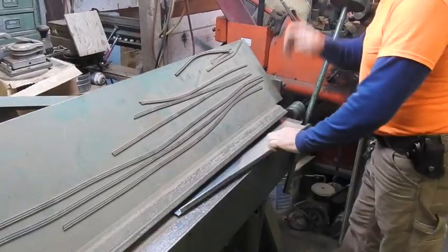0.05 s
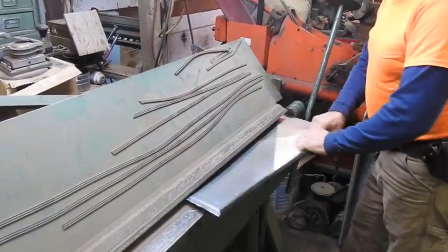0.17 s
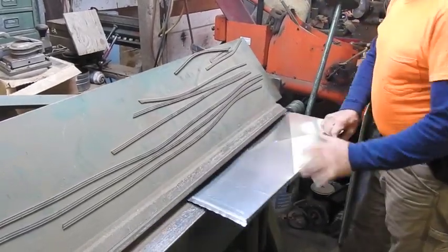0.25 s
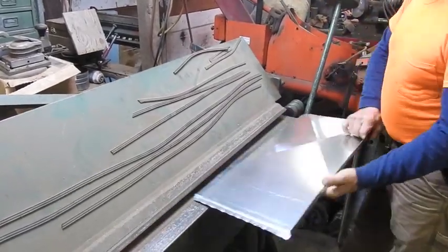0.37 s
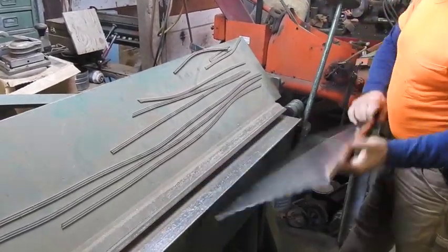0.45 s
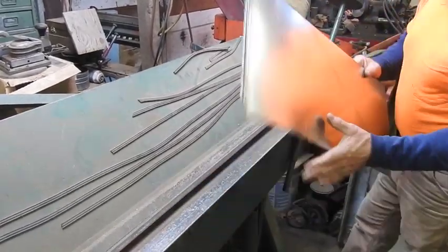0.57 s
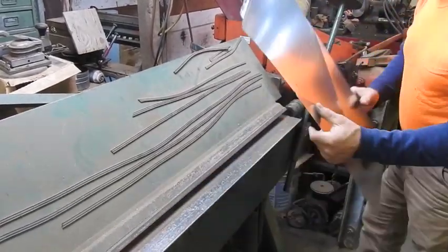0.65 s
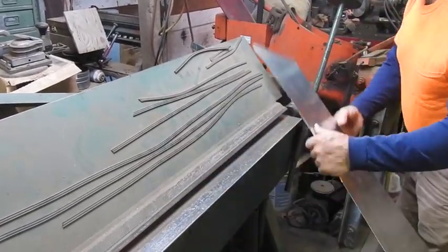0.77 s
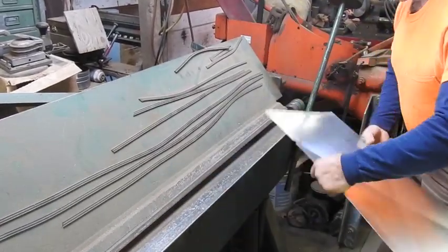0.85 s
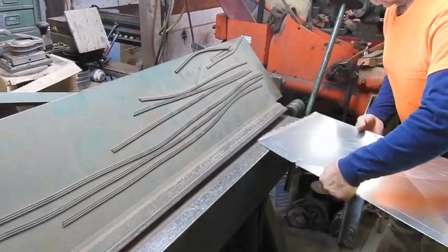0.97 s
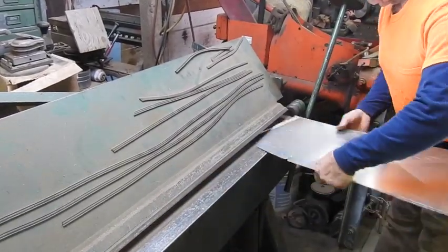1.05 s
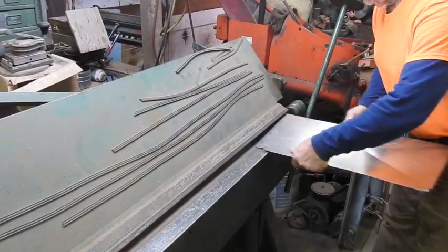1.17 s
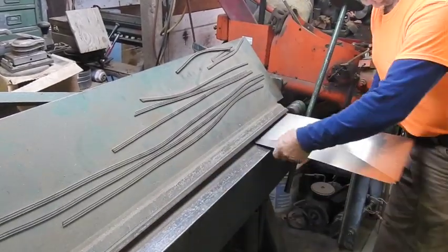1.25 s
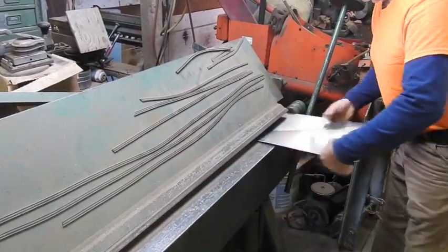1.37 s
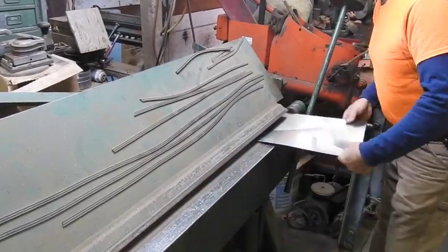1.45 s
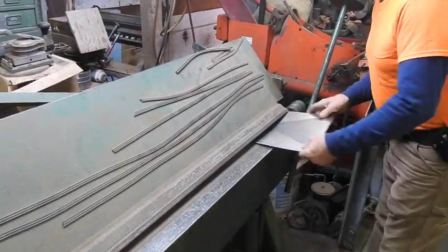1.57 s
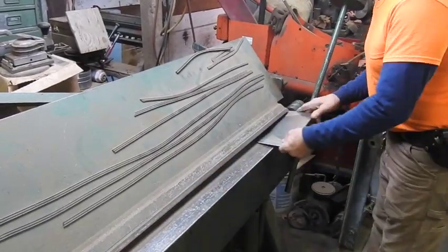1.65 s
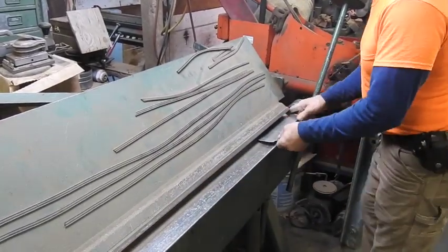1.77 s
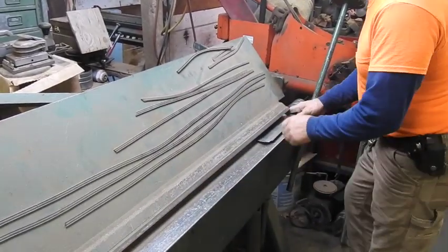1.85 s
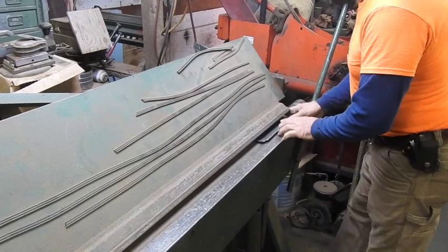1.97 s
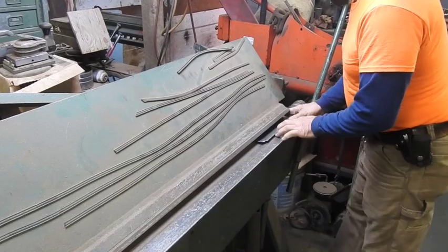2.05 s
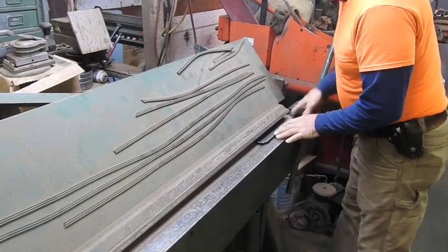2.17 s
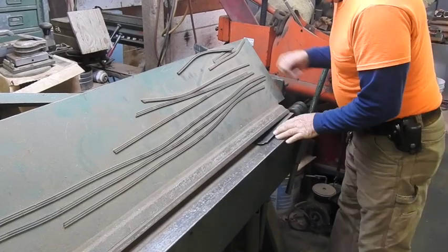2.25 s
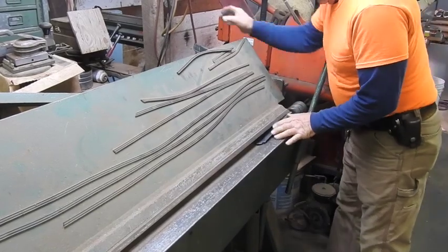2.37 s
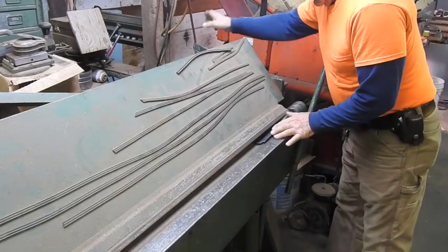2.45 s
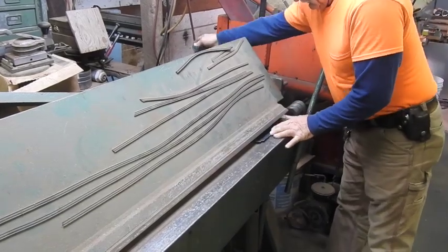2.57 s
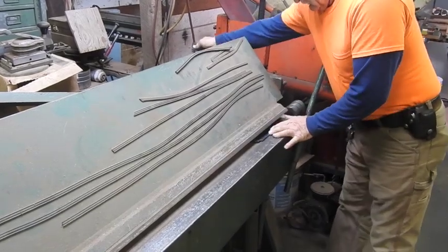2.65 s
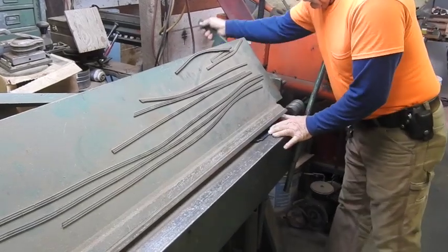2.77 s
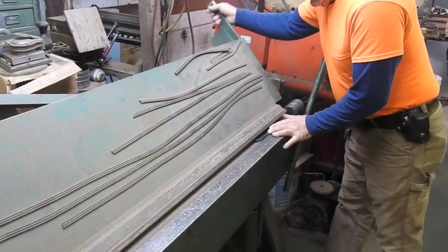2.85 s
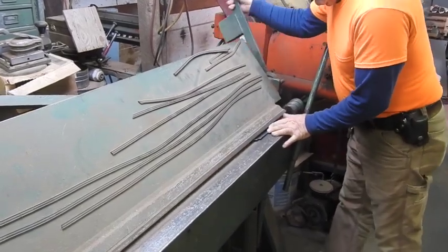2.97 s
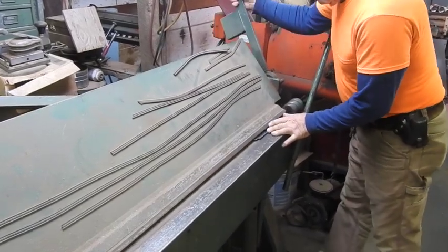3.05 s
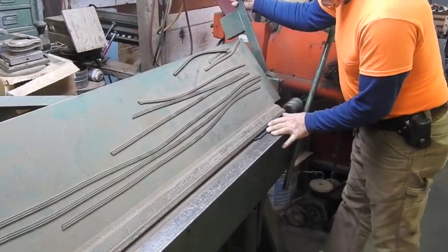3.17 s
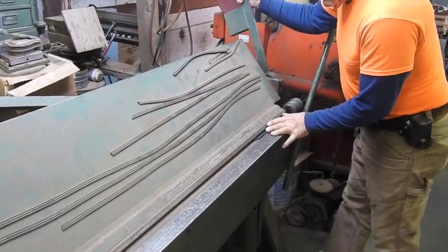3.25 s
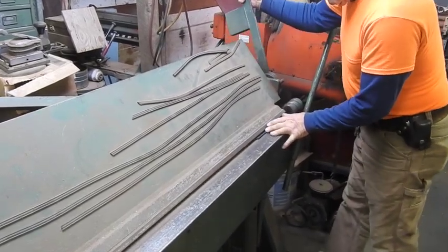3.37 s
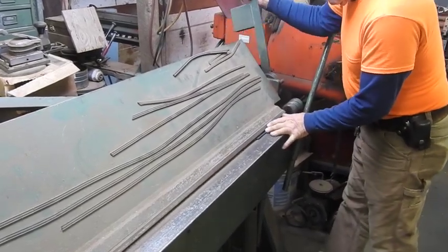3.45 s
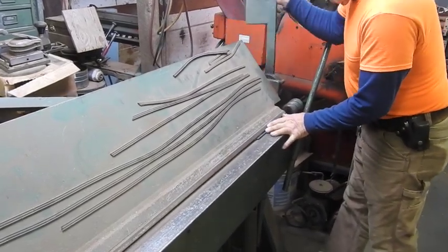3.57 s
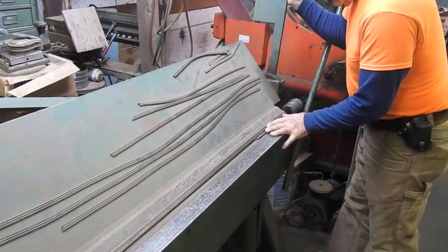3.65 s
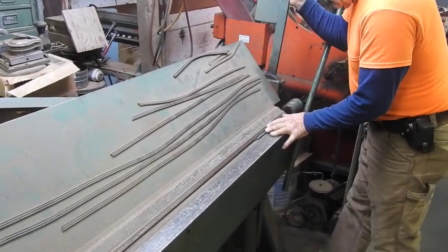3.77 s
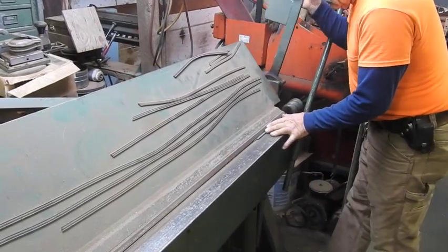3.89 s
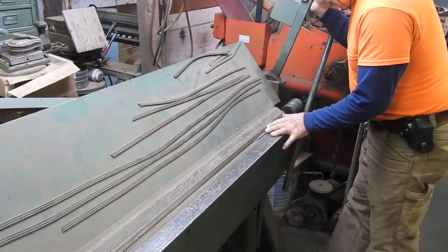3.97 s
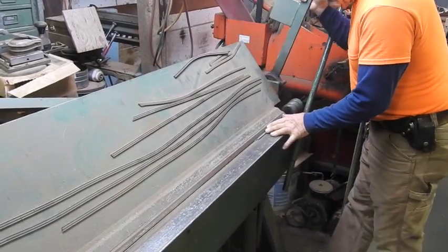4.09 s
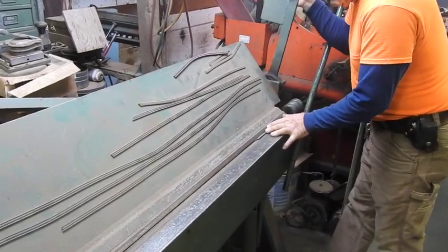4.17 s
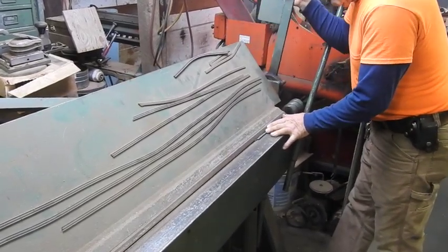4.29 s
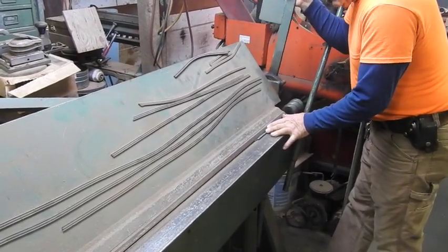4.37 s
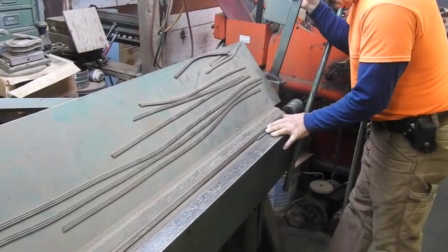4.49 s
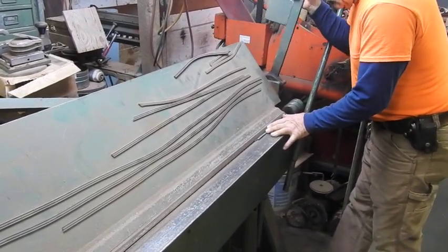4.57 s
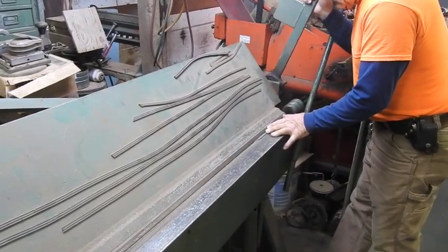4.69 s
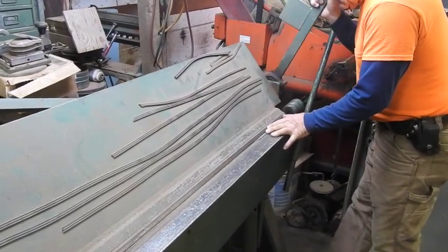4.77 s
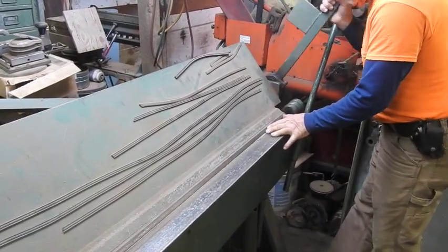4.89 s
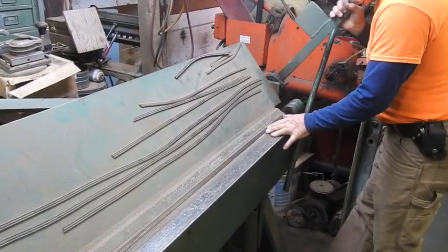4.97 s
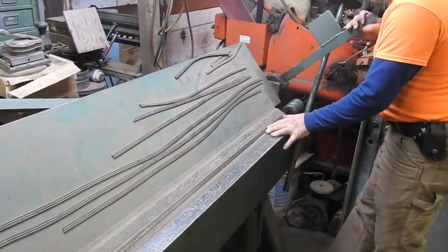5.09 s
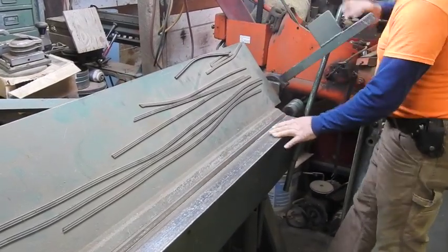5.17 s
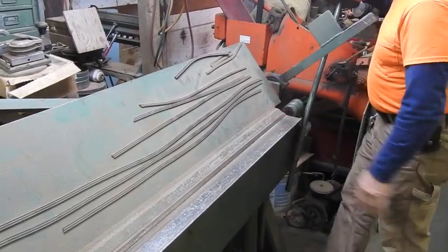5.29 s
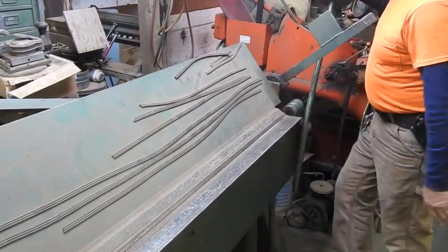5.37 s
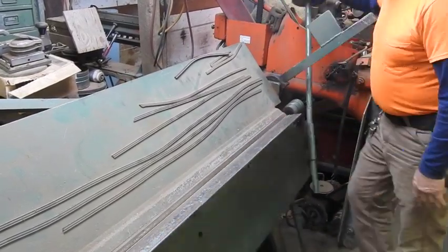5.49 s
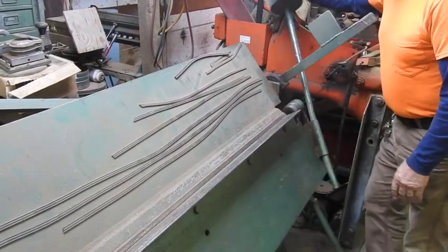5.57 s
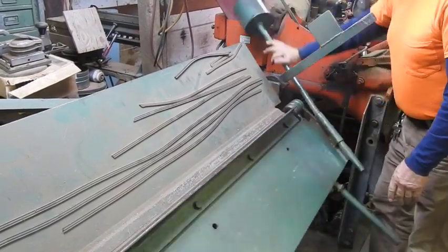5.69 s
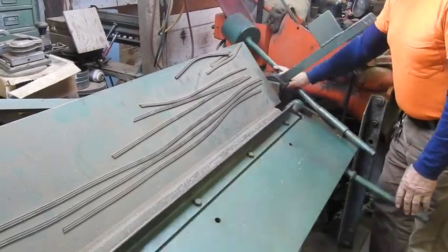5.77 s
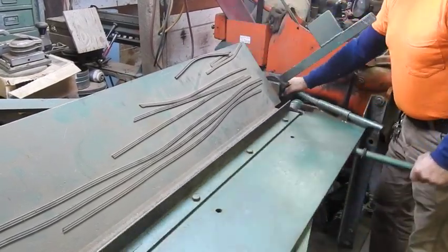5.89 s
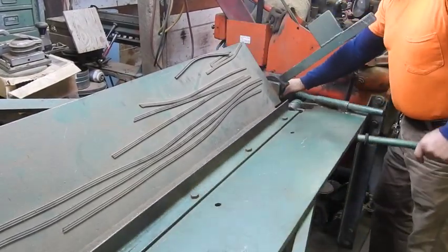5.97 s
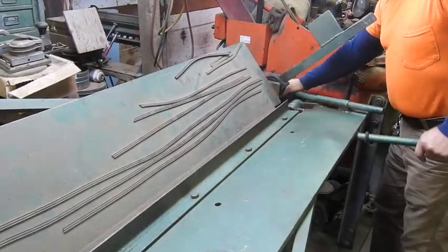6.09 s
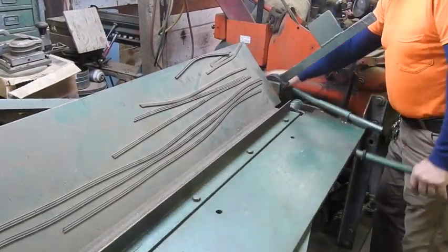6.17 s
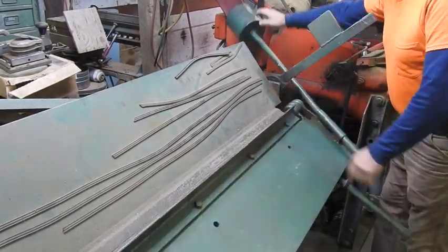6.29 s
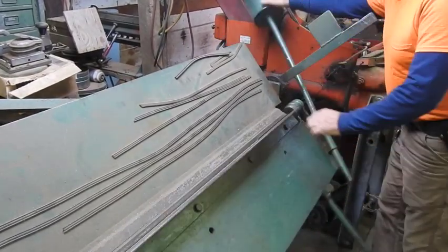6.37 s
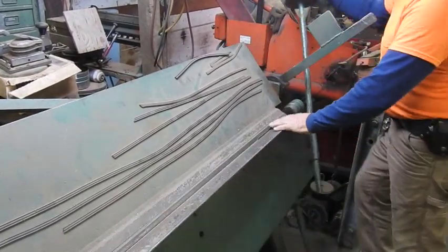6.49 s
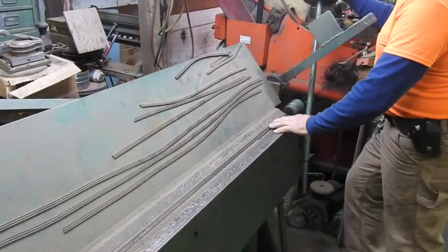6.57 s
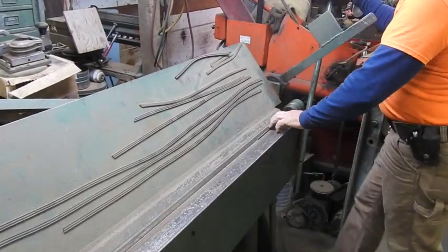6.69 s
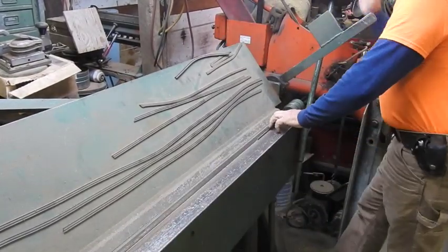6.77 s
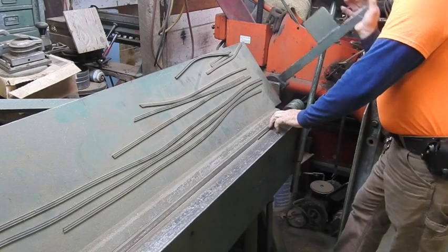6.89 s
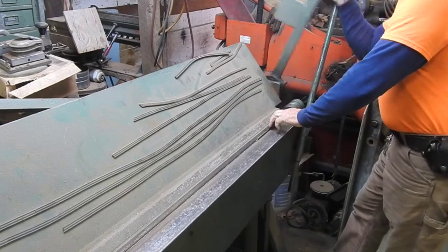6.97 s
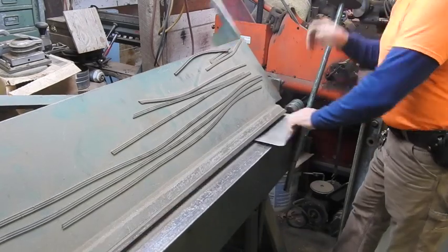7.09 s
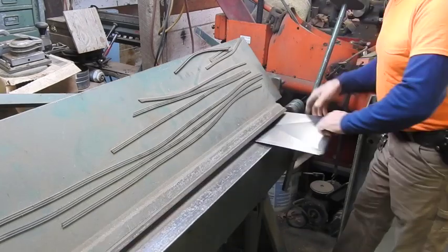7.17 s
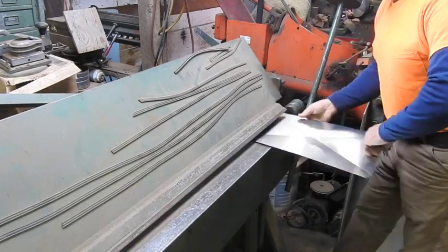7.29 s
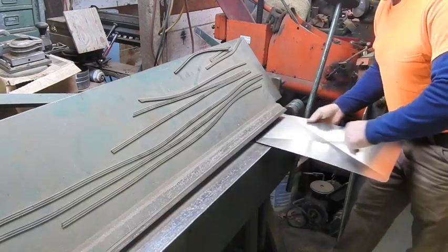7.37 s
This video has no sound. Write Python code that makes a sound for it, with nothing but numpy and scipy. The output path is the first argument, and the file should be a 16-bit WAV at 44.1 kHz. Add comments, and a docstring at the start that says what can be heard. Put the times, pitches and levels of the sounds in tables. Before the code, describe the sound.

Thin sheet metal hisses, bangs and squeals against a heavy steel bed, heard closely in stereo with short workshop reverberation. After a brief gap it is fed back with sharper, ringing scrapes and taps. The clamp lever thuds, then a long quieter stretch holds only light knocks, scuffs and faint hinge creaks over steady room noise. Finally several hard metal knocks cluster together and another ringing scrape bursts out.

```python
"""A steel sheet is dragged out of a hand bending brake, flipped with a crashing wobble and fed back under the jaw.
Frictional catches at its edge excite hiss, plate modes and the brake's bed; impulses make its landings.
The clamp lever knocks, the leaf swings up and back on creaking hinges, the clamp clanks open and the sheet
scrapes out: decaying noise and resonances form the knocks, gliding sines the creaks.
A small reverberant workshop with steady air noise and a faint mains buzz surrounds two close microphone ports."""
import sys
import numpy as np
from scipy import signal
from scipy.fft import rfft, irfft, next_fast_len
from scipy.io import wavfile
from scipy.ndimage import map_coordinates

SR = 44100
rng = np.random.default_rng(int(sys.argv[2]) if len(sys.argv) > 2 else 0)


def log_audio(samples):
    """Write samples as a 16-bit WAV file to the path given in sys.argv[1]."""
    # one column per channel
    frames = np.atleast_2d(samples).T
    # limit to full scale, then quantise
    limited = np.clip(frames, -1, 1)
    pcm = np.round(limited * 32767).astype(np.int16)
    wavfile.write(sys.argv[1], SR, pcm)


N = 328104
TIME = np.arange(N) / SR  # s, whole scene
AFTER = np.arange(SR // 2) / SR  # s, since one event

# how freely the main modes sing as the jaw holds the sheet: t/s, modes relative to plate/dB
MODE_FREEDOM = [(0, -33), (1.2, -16), (1.45, 5.5), (1.85, 2.5), (2.3, 4), (2.6, 3), (7.05, 17), (7.4, -9)]
# spectra of the edge hiss, the dense plate modes and the bed: f/Hz, relative level/dB per Hz
EDGE_SPECTRUM = [(1500, -26), (3500, -12), (5000, -3), (7000, -2), (8000, -5), (9200, -0.5), (11000, 0.5),
                 (13500, 2.5), (16000, -1.5)]
PLATE_SPECTRUM = [(300, -57), (750, -21), (1000, -16), (1450, -8), (1750, -3), (2200, 1), (2800, 3.5),
                  (4200, -1), (6000, -9.5), (12000, -33.5)]
BED_SPECTRUM = [(25, -49), (75, -67), (125, -20.5), (190, -14), (275, -22), (380, -7), (520, -3.5),
                (670, 1.5), (860, -6), (1300, -8), (3000, -39)]


def sliding():
    """Friction excitation: catches of the edge hiss, ring the sheet and rumble in the brake's bed."""
    edge, ring, bed = pressure()
    catches = slips(rate=2200, spread_db=0.5, smooth=0.65)
    judder = amp(1.47 * wobble(90))  # the pressure is never even
    grip = unit(wandering(catches, patchy_db=3.5, life=0.08)) * judder
    hiss_source = wandering(catches, patchy_db=1.0, life=0.11) * judder
    hiss = edge * coloured(hiss_source, EDGE_SPECTRUM)

    plate_source = grip + 0.45 * pings(count=1100, t60=0.14, spread_db=22.5)
    plate = amp(-2.5) * ring * coloured(plate_source, PLATE_SPECTRUM)
    modes = amp(-4.5) * sheet_modes(ring * grip) / np.std(sheet_modes(grip))
    singing = amp(np.interp(TIME, *np.transpose(MODE_FREEDOM)))
    sheet_ring = (plate + singing * modes) / np.hypot(1, singing)

    rumble = amp(-0.5) * bed * coloured(grip, BED_SPECTRUM)
    return hiss + sheet_ring + rumble


# the hands push or pull the sheet over the bed: t/s, rise/s, hold/s, hiss level/dB, easing over the hold/dB,
# relative sheet ring over hiss/dB, relative bed rumble over hiss/dB
HAND_PUSHES = [ (0, 0.016, 0.027, -20.5, 0, -1, -3.5), (0.019, 0.07, 0.12, -18, 3, -8, -20.5),
               (.19, 0.021, .2, -25.5, 5.5, -4.5, -15.5), (0.326, 0.019, .02, -31, 0, 1, -7.5),
               (0.403, 0.019, 0.0072, -20.5, 1, -20, -24), (.428, 0.009, 0.056, -17, 2.5, -10.5, -16.5),
               (0.48, 0.056, .03, -41, 5.5, 0, 7.5), (0.97, 0.029, 0.0059, -18.5, 5.5, 0, -3.5),
               (1.091, 0.014, 0.079, -17.5, 6, 2.5, -10.5), (1.173, 0.016, 0.11, -26.5, 2.5, -3.5, -24),
               (1.279, .01, 0.098, -24.5, 4.5, 3.5, -26), (1.322, 0.015, .012, -21, 0, 2.5, -3),
               (1.374, 0.0081, 0.11, -23, 1.5, 4, -3.5), (1.543, 0.1, 0.018, -28.5, -2.5, 6, -7.5),
               (1.672, 0.011, 0.17, -33, 18, 3, 0.5), (1.83, .01, 0.082, -45, 10, 9, 5),
               (1.937, 0.022, 0.14, -53, 0.5, 7, 14), (2.133, 0.039, 0.05, -47.5, 4, 1, 2),
               (2.229, 0.045, .005, -38.5, 7, 7.5, 5.5), (2.27, 0.0065, 0.21, -24.5, 11.5, 5, -5.5),
               (2.518, 0.029, 0.023, -30.5, -6, -10, -3.5), (2.564, 0.024, 0.038, -38.5, 0.5, 9, 6),
               (2.652, 0.026, 0.063, -56, 3, -2, 18), (7.013, 0.026, 0.072, -26, -3, 6, -4.5),
               (7.125, 0.04, 0.071, -26.5, 1.5, 3.5, -16.5), (7.234, 0.011, 0.12, -21, 9, 2, -10),
               (7.31, 0.079, 0.09, -39.5, 10.5, 7.5, 12), ]
LAYER_T60_S = (0.07, 0.18, 0.13)  # edge, ring and bed once a push ends


def pressure():
    """Power summation: each push drives edge, sheet and bed together, and overlapping pushes add in power."""
    power = np.zeros((3, N))
    for s, rise, hold, db, ease_db, ring_db, bed_db in HAND_PUSHES:
        for layer, layer_db, release in zip(power, (0, ring_db, bed_db), LAYER_T60_S):
            gain = amp(db + layer_db) * swell(s, rise, hold, ease_db, release)
            layer += gain ** 2
    return np.sqrt(power)


def swell(s, rise, hold, ease_db, release):
    """Envelope of one movement: linear growth, a drift in dB over the hold, then exponential decay."""
    t = TIME - s
    eased = ease_db * np.clip((t - rise) / max(hold, 0.001), 0, 1)
    released = 60 * np.maximum(t - rise - hold, 0) / release
    return np.clip(t / max(rise, 0.001), 0, 1) * amp(-np.minimum(eased + released, 200))


def slips(rate, spread_db, smooth):
    """Random catches of a steel edge on smooth friction, smeared by dispersion of bending waves."""
    struck = rng.random(N) < rate / SR
    sizes = amp(spread_db * np.clip(rng.standard_normal(N), -2, 2))
    catches = struck * rng.choice([-1, 1], N) * sizes
    # the treble of each catch arrives before its bass
    catches = filtered(catches, lambda hz: np.exp(-2j * np.pi * 0.7 * np.sqrt(hz)))
    return unit(unit(catches) + smooth * rng.standard_normal(N))


def wandering(x, patchy_db, life):
    """Position-dependent modal coupling: as the contact point moves, each narrow band swells and fades."""
    z = signal.stft(x, nperseg=2048)[2]
    band, frame = np.indices(z.shape)
    place = [band / 2.5, frame * 1024 / SR / max(life, 0.03)]
    field = map_coordinates(rng.standard_normal((420, 260)), place, order=1)
    return signal.istft(z * amp(patchy_db * unit(field)), nperseg=2048)[1][:len(x)]


def pings(count, t60, spread_db):
    """Single-mode decay: at random moments one mode rings, its pitch bending as the sheet flexes."""
    out, t = np.zeros(N), AFTER[:SR // 10]
    for when, pitch, size, bend in rng.random((count, 4)):
        hz = 900 * 8 ** pitch
        phase = 2 * np.pi * hz * t * (1 + (bend - 0.5) * t)
        decay = amp(spread_db * size - 60 * t / t60)
        add(out, when * N / SR, decay * np.sin(phase))
    return unit(out)


# the sheet's main modes: f/Hz, bandwidth/Hz, relative level/dB
MAIN_MODES = [(1167, 49, -4), (1290, 63, -2.5), (1404, 67, 2.5), (1588, 39, 7.5), (1825, 44, -13),
              (2125, 16, -3), (2119, 73, 5), (2225, 39, -1), (2510, 100, -7), (2925, 53, -11),
              (3075, 37, -5.5), (3290, 100, -12.5), (3690, 41, -6), (3900, 35, -8), (4390, 50, -7.5),
              (4380, 13, -19), (4850, 23, -18), (4740, 36, -18), (5760, 59, -30), (6170, 30, -27),
              (6550, 130, -18)]


def sheet_modes(x):
    """Modal superposition: the main modes respond in parallel to one excitation."""
    def response(hz):
        return sum(amp(db) * resonance(hz, centre, width) for centre, width, db in MAIN_MODES)
    return filtered(x, response)


# the sheet's edge hits the bed: t/s, relative crash level/dB, relative ring over crash/dB
EDGE_HITS = [(.0115, -3, -16), (0.341, -9.5, -8), (0.4302, -1.5, -23), (0.6026, -27.5, 27.5),
             (0.6297, -15, 0), (0.973, -0.5, -6.5), (.9921, -7, 5.5), (1.084, -6, -14), (1.107, 0.5, -19),
             (1.1636, -2, -0.5), (1.3347, -2.5, -9), (1.3758, 0.5, 2.5), (1.6224, -11, -10),
             (1.829, -19, 7), (1.9556, -30, 13), (2.0065, -25.5, 7), (2.2764, -1.5, 8.5),
             (2.2853, -14.5, 19), (2.5303, -5.5, 3), (2.5457, -14, 16.5), (7.02, -15.5, 10.5),
             (7.2436, -8.5, 7)]


def taps():
    """Impact excitation: the edge lands with a bright crash, and the sheet's modes ring on."""
    out = np.zeros(N)
    for s, db, ring_db in EDGE_HITS:
        crash = burst(t60=0.18, attack=0.0009)
        body = blow(coloured(crash, PLATE_SPECTRUM))
        body += 1.46 * blow(sheet_modes(burst(t60=0.044, attack=0.00064)))
        body += 0.098 * blow(chime(t60=0.16, count=70))
        bright = blow(coloured(crash, EDGE_SPECTRUM))
        add(out, s, amp(db - 17) * (bright + amp(ring_db - 12) * body))
    return out


def chime(t60, count):
    """Modal decay: a random handful of high modes, the higher dying sooner; t60 holds at 3 kHz."""
    pitch, phase = rng.random((2, count, 1))
    hz = 1200 * (15500 / 1200) ** pitch
    decay = amp(-60 * AFTER / t60 * (hz / 3000) ** 0.26)
    return np.sum(np.sin(2 * np.pi * (hz * AFTER + phase)) * decay, axis=0)


# the sheet buckles as it is swung over and again as it is caught: t/s, rise/s, level/dB
BUCKLINGS = [(0.555, 0.015, -16.5), (0.634, 0.026, -21.5)]
# spectrum of the buckling: f/Hz, relative level/dB per Hz
FLEX_SPECTRUM = [(30, -42), (70, -51), (130, -23.5), (280, -21), (480, -6.5), (670, 0.5), (1000, -1.5),
                 (1500, 0), (2100, 3), (3200, -5.5), (4500, -16), (6500, -27), (9000, -28.5), (15000, -22)]


def flip():
    """Buckling: the swung sheet snaps to and fro in a quick, dull run of random catches."""
    snaps = wandering(slips(rate=1000, spread_db=1.0, smooth=0.76), patchy_db=3.5, life=0.0621)
    swings = [amp(db) * swell(s, rise, hold=0.04, ease_db=0, release=0.2) for s, rise, db in BUCKLINGS]
    bending = np.linalg.norm(swings, axis=0)  # overlaps add in power
    return bending * coloured(snaps, FLEX_SPECTRUM)


# sticking edges and dry hinges sing: t/s, length/s, nominal f/Hz, relative level/dB
STICK_SLIPS = [(.048, 0.16, 1097, -29), (0.072, .13, 1208, -30.5), (0.347, 0.043, 2470, -24.5),
               (1.149, 0.043, 2580, -18), (1.284, 0.075, 3010, -19), (1.287, 0.17, 1416, -27.5),
               (1.592, 0.037, 2080, -27), (1.827, .017, 2072, -19), (2.003, .018, 2880, -44),
               (2.024, .018, 3260, -44), (2.279, 0.096, 2130, -27), (2.364, 0.1, 1550, -30),
               (2.54, 0.026, 2125, -15), (2.813, 0.11, 1790, -50.5), (3.029, 0.15, 1757, -54),
               (5.738, .07, 1595, -56), (6.011, 0.077, 1906, -47.5), (6.446, .045, 1930, -51),
               (7.17, 0.13, 1422, -31)]


def squeals():
    """Stick-slip oscillation: friction locks to one unsteady resonance, its pitch arching with the pressure."""
    out = np.zeros(N)
    drift, rough = wobble(160), amp(2.5 * wobble(200))
    for s, length, hz, db in STICK_SLIPS:
        u = np.clip((TIME - s) / length, 0, 1)
        on = (u > 0) & (u < 1)
        arch = np.sin(np.pi * u[on]) - 0.6
        pitch_hz = hz * (1 + 0.026 * drift[on] + 0.063 * arch)
        phase = 2 * np.pi * np.cumsum(pitch_hz) / SR
        envelope = np.sin(np.pi * u[on] ** 0.67) * rough[on]
        out[on] += amp(db - 2) * envelope * np.sin(phase)
    return out


# the brake's lever and leaf knock: t/s, relative level/dB, main resonance f/Hz,
# contact cut-off f/Hz, number of contacts; the first contact has these frequencies
BRAKE_KNOCKS = [(.017, -21.5, 774, 1380, 1), (2.721, -23.5, 527, 560, 2), (2.979, -42.5, 1280, 1280, 1),
                (3.576, -39, 690, 1600, 1), (3.659, -48.5, 720, 1000, 1), (5.127, -30.5, 768, 2020, 1),
                (5.132, -27.5, 804, 1290, 1), (5.226, -44.5, 840, 1200, 1), (5.716, -44.5, 1080, 2200, 2),
                (6.571, -46.5, 457, 600, 1), (6.908, -43, 764, 800, 1), (6.935, -32, 764, 1110, 1),
                (7.04, -13, 980, 2300, 1), (7.047, -20, 1730, 2400, 1), (7.061, -18, 1100, 2200, 1),
                (7.099, -16, 678, 1000, 4)]
FREE_KNOCK_T60_S = 0.17
BOUNCE_S, BOUNCE_LOSS_DB, BOUNCE_SOFTENING = 0.0175, 2, 0.906  # spacing, loss, frequency ratio per contact


def knocks():
    """Inelastic rebound: lever and leaf meet their stops, and each bounce is weaker and duller."""
    out = np.zeros(N)
    for s, db, pitch_hz, cutoff_hz, contacts in BRAKE_KNOCKS:
        count = max(round(contacts), 1)
        t60 = FREE_KNOCK_T60_S / np.sqrt(count)  # a part that chatters damps itself
        for k in range(count):
            soft = BOUNCE_SOFTENING ** k
            hit = knock(soft * pitch_hz, soft * cutoff_hz, t60)
            add(out, s + k * BOUNCE_S, amp(db - 5.0 - k * BOUNCE_LOSS_DB) * hit)
    return out


# spectrum of the brake's frame: f/Hz, relative level/dB per Hz
FRAME_SPECTRUM = [(30, -52), (80, -68), (130, -16.5), (280, -18), (450, -5), (750, 2.5), (1200, -9.5),
                  (2000, -8), (3500, -6.5), (7000, -6.5), (16000, -9)]


def knock(pitch_hz, cutoff_hz, t60):
    """Contact-limited impact: the frame thuds, and the struck part resonates at its own pitch."""
    thud = coloured(burst(t60, attack=0.0019), FRAME_SPECTRUM)
    # small parts lack bass
    thud = signal.lfilter(*signal.butter(2, min(0.6 * pitch_hz, SR / 4), 'high', fs=SR), thud)
    # slow contacts lack treble
    thud = blow(signal.lfilter(*signal.butter(2, min(cutoff_hz, SR / 4), fs=SR), thud))
    # one push, then chatter
    kick = signal.unit_impulse(len(AFTER)) + 0.12 * burst(t60=0.018, attack=0.0006)
    part = blow(filtered(kick, lambda hz: resonance(hz, pitch_hz, 85) * resonance(hz, pitch_hz, 550)))
    return 0.87 * thud + 0.87 * part


# hands, shoes and the lever scuff: peak t/s, relative level/dB, decay t60/s, brightness/dB per octave
LIGHT_RUBS = [(0.873, -45, .25, 0.5), (2.842, -35.5, .11, 4.5), (3.064, -48.5, 0.22, -2.5),
              (3.342, -43.5, 0.19, -1.5), (4.847, -42, 0.13, -0.5), (5.246, -55, 0.9, 5),
              (5.555, -39.5, 0.13, 5), (5.76, -55, 1, 13), (6.121, -50, .2, 5), (6.21, -38, .075, 4.5),
              (6.263, -57.5, 0.15, 2.5), (6.465, -55, 0.32, 3), (6.557, -48.5, .19, 2.5),
              (6.771, -50, .08, -0.5)]
# spectrum of a rub before its brightness tilt: f/Hz, relative level/dB per Hz
RUB_SPECTRUM = [(25, -46), (70, -26), (150, -4), (300, -6.5), (900, -1.5), (2200, 3.5), (4500, -0.5),
                (8000, -7.5), (15000, -2)]
RUB_RISE, RUB_HZ = 0.19, 2050  # time of a 20 dB rise over decay t60; resonance of the rubbed parts, Hz


def scuffs():
    """Rubbing noise: light friction swells and fades through a broad resonance."""
    out = np.zeros(N)
    t = AFTER - AFTER[-1] / 4  # zero at the peak
    for s, db, length, bright_db in LIGHT_RUBS:
        shape = amp(np.minimum(20 * t / (RUB_RISE * length), -60 * t / length))
        rub = wandering(rng.standard_normal(len(t)), patchy_db=3, life=0.046)
        rub = filtered(rub, lambda hz: 1 + 0.39 * resonance(hz, RUB_HZ, RUB_HZ / 4))
        add(out, s + t[0], amp(db + 1.5) * shape * coloured(rub, RUB_SPECTRUM, bright_db))
    return out


# the brake's mass shakes the floor: t/s, level/dB, t60/s
FLOOR_BLOWS = [(0.019, -56, 0.86), (.56, -59, 0.41), (1.109, -61, 0.18), (1.37, -64, 0.15),
               (2.277, -60, 0.13), (2.729, -58, 1.0), (5.165, -50, 0.33), (6.21, -61, 0.18)]
# spectrum of the floor: f/Hz, relative level/dB per Hz
FLOOR_SPECTRUM = [(25, -27), (60, -26), (100, 0), (160, 0), (300, -22), (900, -50)]


def thumps():
    """Structure-borne sound: the heaviest contacts reach the floor as low decaying noise."""
    out = np.zeros(N)
    for s, db, t60 in FLOOR_BLOWS:
        add(out, s, amp(db) * blow(coloured(burst(t60, attack=0.0023), FLOOR_SPECTRUM)))
    return out


# reverberation of the workshop: f/Hz, t60/s
REVERBERATION = [(150, 0.77), (550, 0.35), (1500, 0.22), (4000, 0.22), (12000, 0.12)]


def room(x):
    """Diffuse reverberation: the cluttered shop answers with decaying noise, longest in the bass."""
    hz, t, z = signal.stft(rng.standard_normal(SR), SR, nperseg=256)
    decay = amp(-60 * t / along(REVERBERATION, hz)[:, None])
    tail = signal.istft(z * decay, SR, nperseg=256)[1]
    tail = np.pad(tail, (SR // 200, 0))  # first reflections come 5 ms late
    return signal.fftconvolve(x, tail / np.linalg.norm(tail))[:N]


# difference between the ports: f/Hz, side level/dB
SIDE_LEVEL = [(100, -22), (350, -28), (700, -31), (1400, -25), (2800, -19), (5600, -13), (10000, -8.5),
              (14000, -4.8)]
# balance of the ports: f/Hz, left over right/dB
LEFT_BIAS = [(1700, 0), (2800, -1.6), (5500, -2), (10000, -1.1)]


def ports(x):
    """Decorrelation: shifting near reflections set two close ports apart, mostly in the treble."""
    side = np.zeros(N)
    for _ in range(3):
        near = burst(t60=0.03, attack=0.0005)
        reflection = signal.fftconvolve(x, near / np.linalg.norm(near))[:N]
        side += unit(wobble(100)) * reflection / np.sqrt(3)
    side = filtered(side, lambda hz: amp(along(SIDE_LEVEL, hz)))
    pair = np.array([x + side, x - side])
    return filtered(pair, lambda hz: amp(np.outer([1, -1], along(LEFT_BIAS, hz)) / 2))


# mains buzz: f/Hz, relative level/dB
BUZZ_TONES = [(479.1, -66.5), (721.4, -67), (2159, -68.5), (2401, -71.5), (2880, -72), (3601, -71),
              (4560, -74.5), (4802, -76)]
# workshop air: f/Hz, relative level/dB per Hz
AIR_SPECTRUM = [(15, -68), (25, -35.5), (64, -32), (134, -3), (270, -10), (476, -9), (516, -7.5),
                (734, -12.5), (1790, -16.5), (2110, -11.5), (2280, -16.5), (2480, -14.5), (2760, -13.5),
                (3620, -15.5), (16000, -18)]
# likeness of the air at the two ports: f/Hz, left-right correlation (0 to 1)
AIR_COHERENCE = [(60, 1), (240, 0.84), (950, 0.54), (3770, 0.44), (15000, 0.33)]


def background():
    """Partly coherent noise and tones: steady workshop air and a faint mains buzz."""
    a, b = (coloured(rng.standard_normal(N), AIR_SPECTRUM) for _ in range(2))

    def angle(hz):  # the cosine of twice this angle is the correlation
        return np.arccos(np.clip(along(AIR_COHERENCE, hz), -1, 1)) / 2

    mid = filtered(a, lambda hz: np.cos(angle(hz)))
    side = filtered(b, lambda hz: np.sin(angle(hz)))
    air = amp(-54.0) * np.array([mid + side, mid - side])
    buzz = np.zeros(N)
    for hz, db in BUZZ_TONES:
        buzz += amp(db) * np.sqrt(2) * np.sin(2 * np.pi * hz * TIME + 0.35 * wobble(5))
    return air + amp(-3.5) * buzz


def amp(db):
    """Level definition: decibels to amplitude gain."""
    return 10 ** (np.asarray(db) / 20)


def unit(x):
    """Power normalisation: scale to rms 1."""
    return x / np.sqrt(np.mean(x ** 2) + 1e-20)


def blow(x):
    """Onset normalisation: scale a hit to rms 1 over its first 20 ms."""
    return x / np.sqrt(np.mean(x[:SR // 50] ** 2))


def along(points, hz):
    """Logarithmic frequency scale: interpolate (f/Hz, value) points."""
    f, v = np.transpose(points)
    return np.interp(np.log(hz + 1), np.log(f + 1), v)


def wobble(rate):
    """Band-limited fluctuation: a smooth random curve with rate knots a second."""
    knots = rng.standard_normal(int(N * rate / SR) + 4)
    steps = np.arange(0, len(knots) - 1, 0.125)
    return np.interp(TIME * rate, steps, map_coordinates(knots, [steps]))


def filtered(x, response):
    """Linear filtering: multiply the spectrum by a response of frequency."""
    n = x.shape[-1]
    m = next_fast_len(n + SR // 4)
    return irfft(rfft(x, m) * response(np.fft.rfftfreq(m, 1 / SR)), m)[..., :n]


def coloured(x, points, tilt_db=0):
    """Spectral shaping: impose a spectrum and a tilt per octave, at rms 1."""
    def response(hz):
        octaves = np.log2(np.clip(hz, 250, 8000) / 1000)
        return amp(along(points, hz) + tilt_db * octaves)
    return unit(filtered(x, response))


def resonance(hz, centre, width):
    """Damped oscillator: causal response of one mode."""
    return 1j * hz * width / (centre ** 2 - hz ** 2 + 1j * hz * width)


def burst(t60, attack):
    """Statistical modal density: noise stands for countless modes struck at once and dying together."""
    return rng.standard_normal(len(AFTER)) * amp(-60 * AFTER / t60) * (1 - np.exp(-AFTER / attack))


def add(track, s, sound):
    """Superposition: mix a sound into a track at a time in seconds."""
    part = track[max(round(s * SR), 0):][:len(sound)]
    part += sound[:len(part)]


def scene():
    """Direct and reverberant fields: sheet and brake heard close, with the workshop around them."""
    sheet = sliding() + taps() + flip() + squeals()
    brake = knocks() + scuffs() + thumps()
    reverberant = room(amp(-11.5) * sheet + amp(-9.5) * brake)
    return ports(sheet + brake + reverberant) + background()


def record(dry):
    """Soft saturation and band limiting: round off the tallest peaks and keep nothing from 16 kHz up."""
    rounded = dry / (1 + (dry / 0.95) ** 6) ** (1 / 6)
    return filtered(rounded, lambda hz: hz < 16000)


dry = scene()
out = record(dry)
log_audio(out)
```